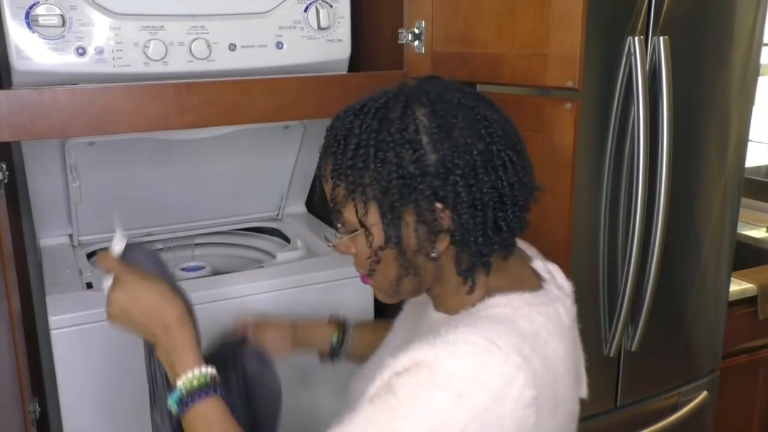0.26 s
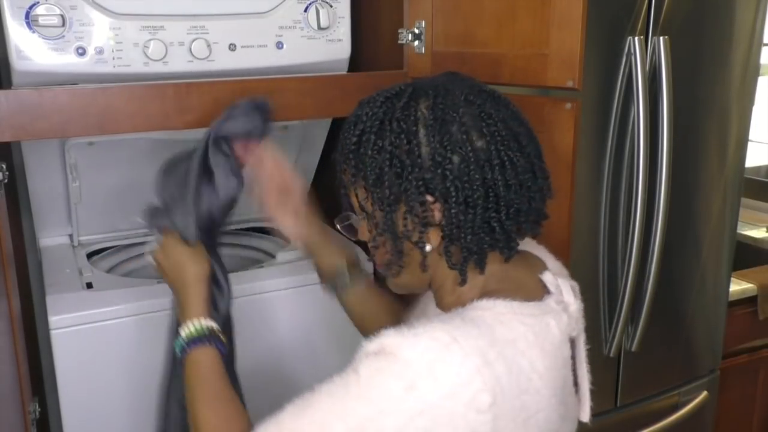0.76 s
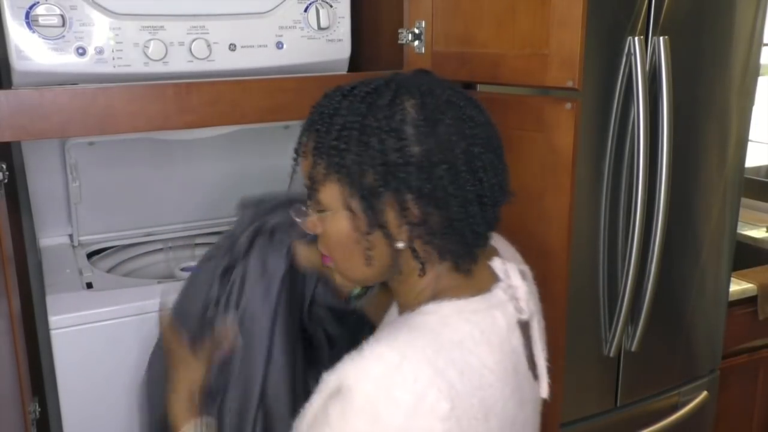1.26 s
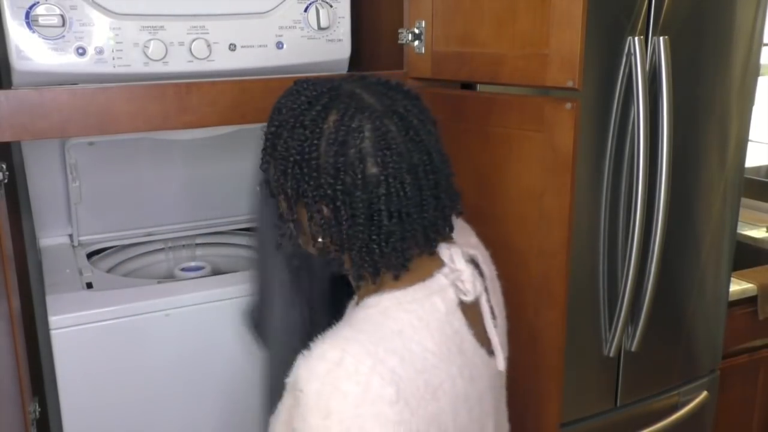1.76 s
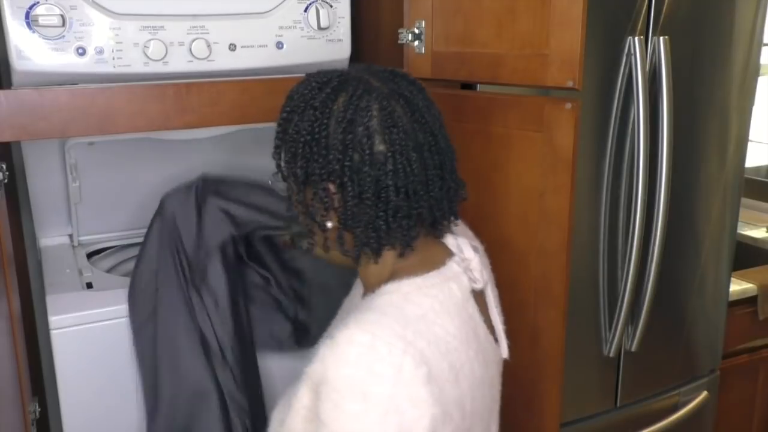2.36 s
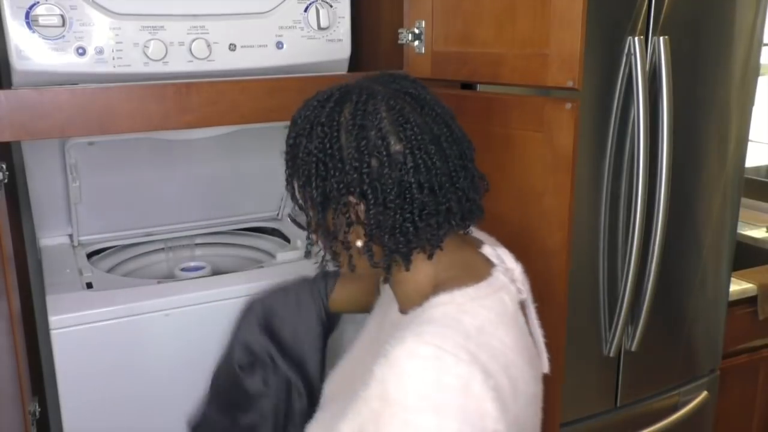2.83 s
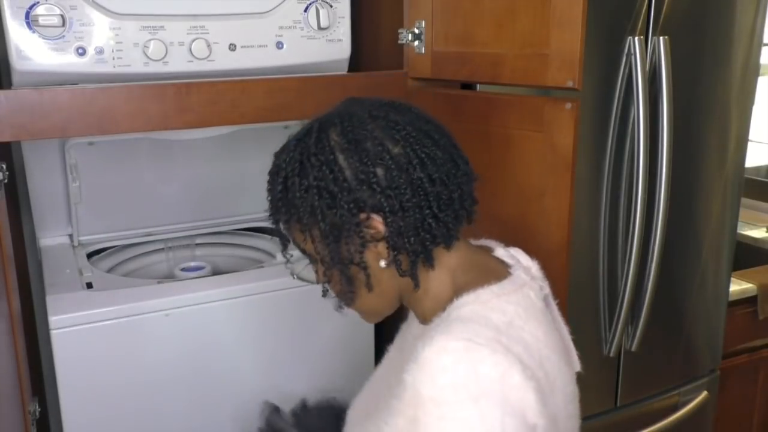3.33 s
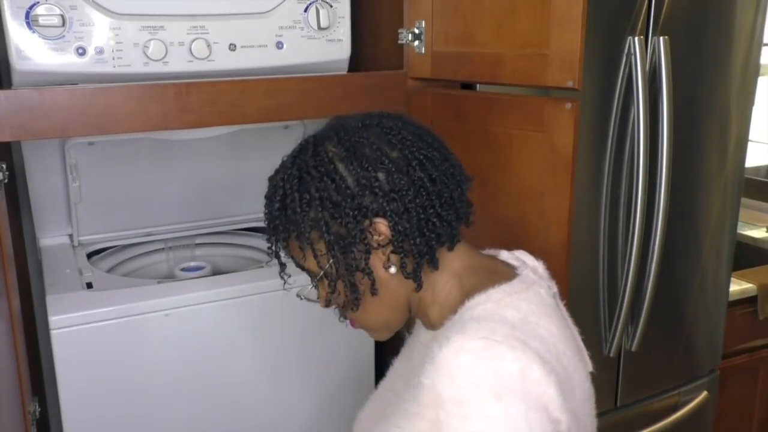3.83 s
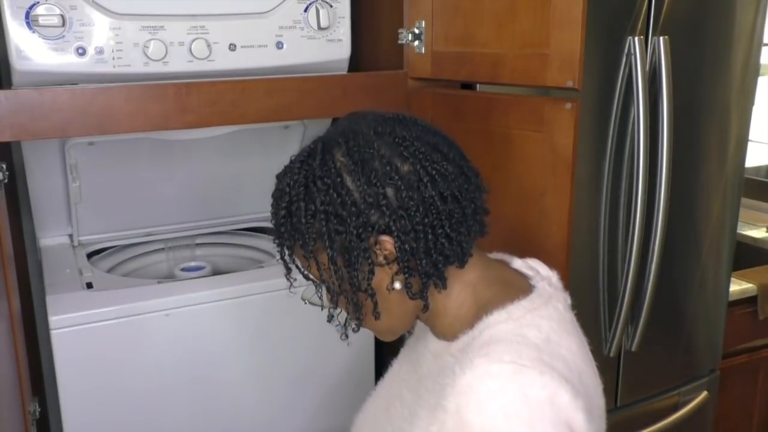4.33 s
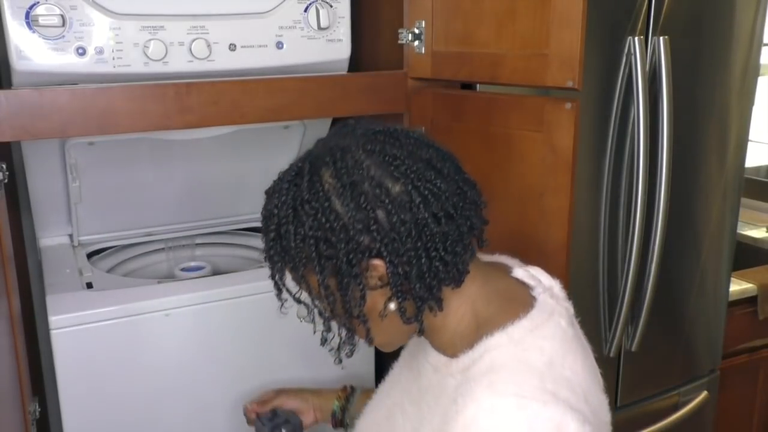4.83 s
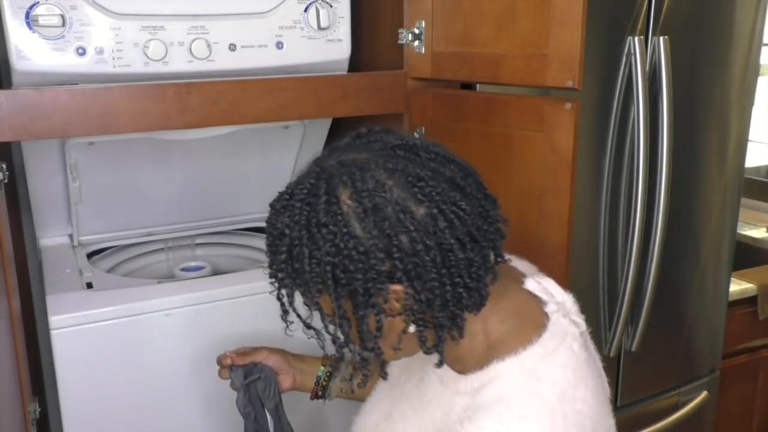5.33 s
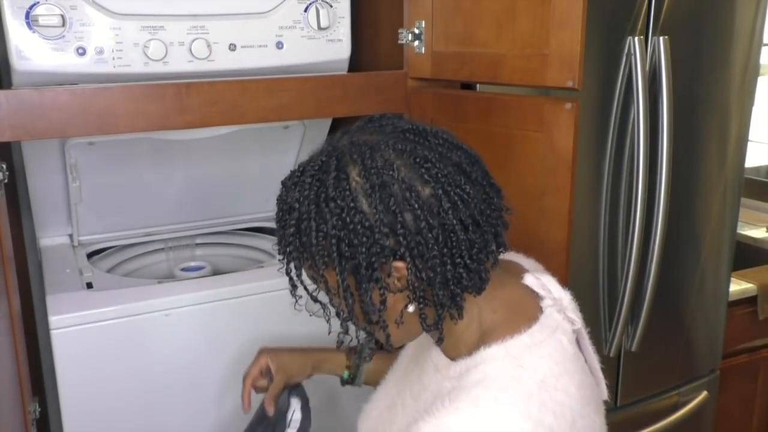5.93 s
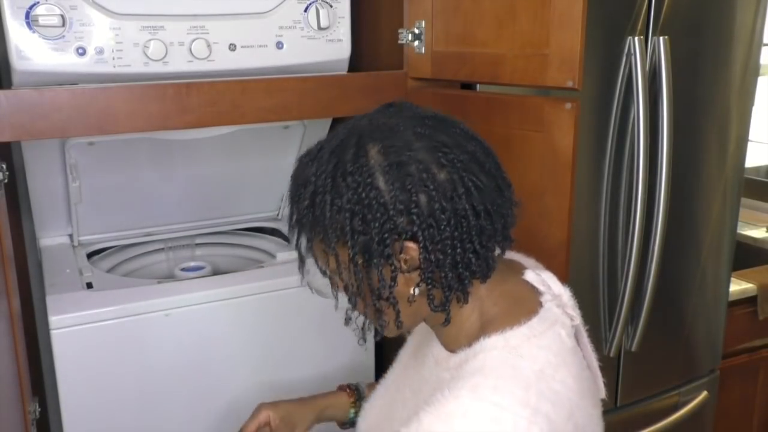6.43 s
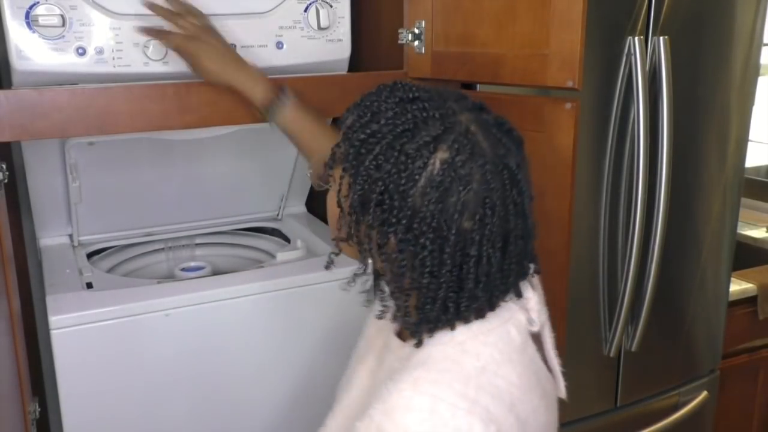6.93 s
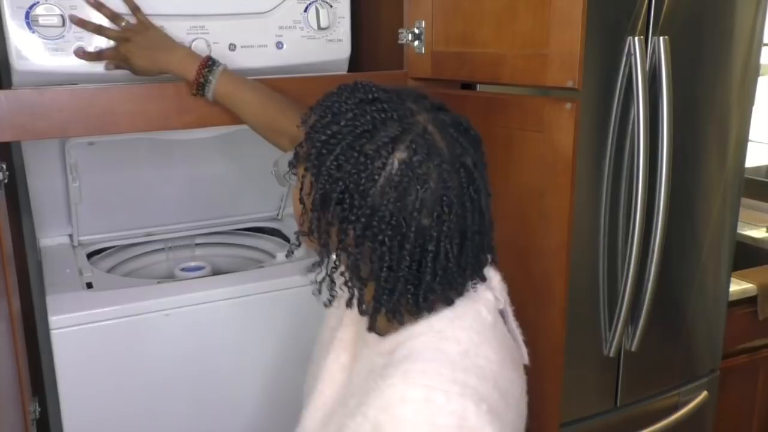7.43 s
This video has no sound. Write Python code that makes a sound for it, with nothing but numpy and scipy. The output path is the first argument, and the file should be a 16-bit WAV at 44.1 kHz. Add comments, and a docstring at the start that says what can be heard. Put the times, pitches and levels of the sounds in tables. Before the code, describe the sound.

Water drums steadily into a hollow washer tub with a soft hiss while a garment is shaken out close by, snapping, rustling, bead bracelets clicking.

```python
"""A top-loading washer fills in a laundry closet: random blows boom in the hollow tub's modes over a faint
pipe drone, and patchy noise hisses through the basket's resonances. Close by, someone shakes out a garment:
swells of coloured noise and crackle rustle, sharp ticks with short noise bursts snap. Bead bracelets click
as wave packets with a brief ring, and hands knock decaying modes out of the control panel."""
import sys
import numpy as np
from scipy import signal
from scipy.fft import rfft, irfft, next_fast_len
from scipy.io import wavfile
from scipy.ndimage import uniform_filter1d, map_coordinates

SR = 44100
rng = np.random.default_rng(int(sys.argv[2]) if len(sys.argv) > 2 else 0)


def store_wav(level_fs):
    """Save 16-bit WAV to argv[1]."""
    pcm = np.round(np.clip(np.atleast_2d(level_fs), -1, 1) * 32767)
    wavfile.write(sys.argv[1], SR, pcm.T.astype(np.int16))


N = 338639
TIME_S = np.arange(N) / SR


def amp(db):
    """Decibels to gain."""
    return 10 ** (np.asarray(db) / 20)


def unit(x):
    """Scale to rms 1."""
    return x / np.sqrt(np.mean(x ** 2) + 1e-20)


def along(points, hz):
    """(f/Hz, value) points read on a log frequency axis."""
    f, v = np.transpose(points)
    return np.interp(np.log(hz + 1), np.log(f + 1), v)


def wobble(rate):
    """A smooth random curve, rate knots a second."""
    knots = rng.standard_normal(int(N * rate / SR) + 4)
    return map_coordinates(knots, [np.arange(N) * rate / SR])


def swell(start_s, length_s, attack_s, release_s):
    """A gain that rises towards 1, stops there, and falls back to 0 once its length is over."""
    t = TIME_S - start_s
    return np.clip(t / attack_s, 0, 1) * np.clip(1 - (t - length_s) / release_s, 0, 1)


def filtered(x, response):
    """x through a response given as a function of frequency."""
    n = x.shape[-1]
    m = next_fast_len(n + 8192)
    return irfft(rfft(x, m) * response(np.fft.rfftfreq(m, 1 / SR)), m)[..., :n]


def resonances(modes, f):
    """Summed power gain of (f/Hz, width/Hz, level/dB) resonances, as amplitude."""
    return np.sqrt(sum(amp(2 * db) / (1 + ((f - hz) / (w / 2)) ** 2) ** 2 for hz, w, db in modes))


def add(track, s, sound):
    """Mix a sound into a track from time s."""
    start = int(np.clip(round(s * SR), 0, N - 1))
    track[start:start + len(sound)] += sound[:N - start]


def impacts(rate, spread_db):
    """Random tiny blows of uneven size, rate a second, rms 1."""
    hit = rng.random(N) < rate / SR
    sign = rng.choice([-1, 1], N)
    size = amp(spread_db * np.clip(rng.standard_normal(N), -2, 2))
    return unit(hit * sign * size)


def patchy(x, depth_db, band_size, time_size):
    """Noise under random gain patches, smoothed over some bands and frames."""
    z = signal.stft(x, nperseg=256)[2]
    across_bands = uniform_filter1d(rng.standard_normal(z.shape), band_size, 0)
    field = uniform_filter1d(across_bands, time_size, 1)
    return signal.istft(z * amp(depth_db * unit(field)), nperseg=256)[1][:N]


def tick(t, hz, cycles):
    """A wave packet whose envelope peaks at 1 after twice the given cycles."""
    u = t * hz / cycles
    return (u / 2) ** 2 * np.exp(2 - u) * np.sin(2 * np.pi * hz * t)


def grains(rate, pitch_hz, octaves, cycles, spread_db):
    """Tiny ticks at random times, each a few cycles of its own pitch; rms 1."""
    when, high, low, size = rng.random((int(rate * N / SR), 4)).T
    hz = pitch_hz * 2 ** (octaves * (high - low))
    gain = amp(spread_db * np.minimum(-np.log(1 - size), 3))
    k = np.arange(SR // 200)
    ticks = gain[:, None] * tick(k / SR, hz[:, None], cycles)
    places = (when * N).astype(int)[:, None] + k
    return unit(np.bincount(places.ravel(), ticks.ravel(), N)[:N])


def band_noise(t, pitch_hz, octaves):
    """Noise of rms 1 in a bell-shaped band."""
    bell = lambda hz: np.exp(-.5 * (np.log2((hz + 1) / pitch_hz) / octaves) ** 2)
    return unit(filtered(rng.standard_normal(len(t)), bell))


def spread(near, response):
    """A coloured source in stereo, rms 1: direct sound plus diffuse sound from the closet walls."""
    # f/Hz, left-right likeness/1
    likeness = [(40, .55), (100, .85), (200, .995), (600, .96), (1150, .9), (1600, 1)]
    turn = lambda hz: np.arccos(np.clip(along(likeness, hz), -1, 1)) / 2
    shares = lambda hz: response(hz) * [np.cos(turn(hz)), np.sin(turn(hz))]
    mid, side = filtered(np.array([unit(near), rng.standard_normal(N)]), shares)
    return unit(np.array([mid + side, mid - side]))


def closet(x, wet_db, t60_s):
    """A sound plus the closet walls' short answer: exponentially dying noise."""
    t = np.arange(SR // 6) / SR
    tail = rng.standard_normal(len(t)) * amp(-60 * t / t60_s)
    return x + amp(wet_db) * signal.fftconvolve(x, tail / np.linalg.norm(tail))[:len(x)]


def panel():
    """Every knock of the hands rings the plastic panel's modes at new strengths over a dull rattle."""
    # knocks: t/s, relative level/dB
    knocks = [(.233, -9.5), (1.918, -15), (7.1446, -19), (7.3106, -8.5), (7.3207, -5.5), (7.3654, -13.5),
              (7.6646, -14)]
    # plastic panel modes: f/Hz, mean relative level/dB, t60/s
    modes = [(1293, -17.5, 0.026), (1731, -9, 0.11), (1950, -3, 0.094)]
    out, t = np.zeros(N), np.arange(SR // 4) / SR
    for s, db in knocks:
        ring = 0
        for hz, level_db, t60_s in modes:
            decay = amp(level_db + rng.normal(0, 2.4) - 60 * t / t60_s)
            ring = ring + decay * np.sin(2 * np.pi * (hz * t + rng.random()))
        ring = ring / np.abs(ring).max()
        rattle = band_noise(t, pitch_hz=1860, octaves=0.43) * amp(-12.0 - 60 * t / 0.18)
        onset = 1 - np.exp(-t / 0.00054)
        add(out, s, amp(db - 6.5) * (0.69 * ring + rattle) * onset)
    return out


def jiggles():
    """Faint bead contacts at random: rows of (t/s, relative level/dB, f/Hz)."""
    per_s, mid_db, mid_hz = 2, -15, 7500
    draws = rng.random((int(per_s * N / SR), 3))
    return [(when * N / SR, mid_db + 4 * (2 * size - 1), mid_hz * 2 ** (.45 * (2 * pitch - 1)))
            for when, size, pitch in draws]


def beads():
    """Each contact is a few cycles of one pitch; the string and the closet ring on briefly."""
    # bead contacts and, near 2.95 s, bright cloth ticks: t/s, relative level/dB, f/Hz
    contacts = [(0.442, -6, 8100), (1.7712, -5.5, 6100), (1.9887, -5.5, 8580), (2.0282, -5, 6600),
                (2.1153, -9.5, 9200), (2.463, -11.5, 7000), (2.5745, -11, 6750), (2.6434, -10.5, 8900),
                (2.6908, -8, 6120), (2.85, -7, 8600), (2.9482, -10.5, 9300), (2.9654, -11, 7500),
                (3.1556, -14, 6060), (3.2286, -10, 5300), (3.3209, -12.5, 5800), (3.4207, -12, 7350),
                (3.728, -5, 5720), (4.0325, -10.5, 5940), (4.3251, -11, 5700), (4.9775, -5, 5570),
                (5.053, -6.5, 5580), (5.1367, -12, 5700), (5.5155, -9.5, 5970), (5.6342, -6.5, 6750),
                (6.7033, -6, 5800), (7.0205, -7.5, 6400), (7.1797, -4.5, 5600)]
    out, t = np.zeros(N), np.arange(SR // 6) / SR
    for s, db, hz in [*contacts, *jiggles()]:
        contact = tick(t, hz, cycles=1.9)
        onset = 1 - np.exp(-t / 0.00042)
        ring = band_noise(t, hz, octaves=.13) * amp(-10.5 - 60 * t / 0.061) * onset
        add(out, s, amp(db + 2) * (contact + ring))
    return out


def snaps():
    """A sharp tick and its quick rebound, a short crack and the closet's dying answer."""
    # cloth snaps and hand taps: t/s, relative level/dB, f/Hz, relative bandwidth/octaves
    events = [(.036, 0, 4500, 0.54), (.159, -6, 4460, .38), (0.2306, -5, 2560, 0.5), (.414, -7, 3270, 0.23),
              (.614, -7.5, 3980, 0.17), (.828, -5, 4730, 0.53), (.9017, -3, 5470, 0.59),
              (1.223, -9.5, 4300, 0.11), (1.284, -4.5, 5250, 0.28), (1.5196, -7, 4900, 0.27),
              (1.63, -3, 4300, 0.51), (2.2249, -1, 4440, 0.52), (2.707, -3.5, 3000, 0.29),
              (4.2191, -14, 3280, .27), (4.324, -5, 3750, 0.18), (4.347, -12, 3050, 0.17),
              (5.061, -4.5, 4260, .39), (5.107, -12, 4760, 0.33), (5.579, -14, 4460, 0.17),
              (5.661, -9.5, 4600, 0.27), (6.336, -14.5, 3550, 0.14), (7.308, -7.5, 4280, 0.17),
              (7.665, -13.5, 3660, 0.22)]
    out, t = np.zeros(N), np.arange(SR // 4) / SR
    onset = 1 - np.exp(-t / 0.00052)
    for s, db, hz, octaves in events:
        crack = band_noise(t, hz, 1.13 * octaves) * amp(1 - 60 * t / 0.034)
        answer = band_noise(t, hz, 0.94 * octaves) * amp(-5 - 60 * t / .15)
        strike = 0.83 * tick(t, hz, cycles=0.67)
        add(out, s, amp(db - 7.5) * (strike + (crack + answer) * onset))
        rebound_s = s + rng.uniform(.003, .007)
        rebound = tick(t, hz * rng.uniform(0.99, 1.57), cycles=1.3)
        add(out, rebound_s, amp(db - 6.5) * rebound)
    return out


def fibres():
    """Cloth rubbing: patchy noise sprinkled with tiny blows."""
    rough = rng.standard_normal(N) + .45 * impacts(rate=500, spread_db=4.5)
    return patchy(rough, depth_db=3.0, band_size=7, time_size=5)


def cloth():
    """Fabric slides over itself in clumps; creases crackle, and coarse folds add a lower scrape."""
    # shakes and tugs: start t/s, length/s, rustle level before clumping/dB, fold scrape re rustle/dB
    strokes = [(0.004, .09, -18, -3.5), (0.116, 0.17, -19, -8.5), (0.295, .25, -18, -15.5),
               (0.568, 0.31, -17, -17), (0.89, 0.12, -20, -31), (1.045, .28, -18.5, -24),
               (1.344, 0.41, -18, -24), (1.829, 0.046, -15.5, -24), (1.923, .12, -18, -34),
               (2.074, 0.089, -22.5, -15), (2.435, .07, -22, -14.5), (2.54, 0.15, -21.5, -16.5),
               (2.754, 0.089, -26, -13)]
    # swish spectrum: f/Hz, relative level/dB
    swish_points = [(1500, -52), (3500, -12), (5000, -5), (6500, 0), (9000, -0.5), (12000, -2.5),
                    (15500, -12)]
    # coarse-fold spectrum: f/Hz, relative level/dB
    fold_points = [(1500, -32), (2300, -14.5), (3000, -7.5), (4000, -5.5), (5500, -4), (8000, -53)]
    level, scraping = np.zeros(N), np.zeros(N)
    for s, length_s, db, scrape_db in strokes:
        gain = amp(db) * swell(s, length_s, attack_s=0.01, release_s=0.068)
        level = np.maximum(level, gain)
        scraping = np.maximum(scraping, gain * amp(scrape_db))
    clumps = amp(1.32 * wobble(42.13) + 1.5 * wobble(150) - 0.37)
    rub = lambda points: unit(filtered(fibres(), lambda hz: amp(along(points, hz))))
    folds = rub(fold_points) * amp(3 * wobble(80))
    creases = grains(rate=300, pitch_hz=7400, octaves=.6, cycles=1.9, spread_db=5)
    threads = grains(rate=220, pitch_hz=12800, octaves=0.55, cycles=2.7, spread_db=8.0)
    crackle = unit(closet(creases + .36 * threads, wet_db=-1, t60_s=.05))
    # as the shaking slows, separate crackles take over from the swish
    share = np.clip(0.091 + 0.2 * TIME_S, 0, 1)  # crackle's share of power
    rustle = np.sqrt(1 - share) * rub(swish_points) + np.sqrt(share) * crackle
    return clumps * (level * rustle + scraping * folds)


def spray():
    """Fine droplets hiss on the steel basket and pick out its resonances."""
    # spray hiss: t/s, level before the fixed trim and wobble/dB
    hiss_rows = [(2.9, -30), (3.1, -30), (3.88, -30), (4.11, -29.5), (5.6, -26.5), (6.07, -29.5),
                 (6.85, -28), (7.68, -30.5)]
    # steel basket resonances: f/Hz, width/Hz, lift/dB
    basket = [(1235, 21, 8), (2020, 120, 5), (2810, 280, 5), (3560, 23, 9), (3600, 40, -2), (4070, 38, 7.5),
              (4480, 81, 5), (4840, 57, 5), (4780, 160, 4), (5630, 62, 9), (6720, 45, 3), (9170, 120, 5.5)]
    # hiss spectrum: f/Hz, relative level/dB
    hiss_points = [(440, -39), (750, -9.5), (831, -24.5), (1010, -17), (1480, -10), (2170, -11.5),
                   (2370, -9), (3110, -11), (3580, -5.5), (5250, -6), (6360, 1.5), (11000, -4),
                   (12500, -8.5), (15000, -1.5), (16000, -5.5)]
    hiss_db = np.interp(TIME_S, *np.transpose(hiss_rows))
    lift_db = lambda f: sum(db / (1 + ((f - hz) / (w / 2)) ** 2) for hz, w, db in basket)
    colour = lambda hz: amp(along(hiss_points, hz) + lift_db(hz))
    droplets = rng.standard_normal(N) + 0.65 * impacts(rate=1100, spread_db=7.0)
    drops = patchy(droplets, depth_db=2.4, band_size=5, time_size=9)
    level_db = hiss_db + 2.86 + 0.4 * wobble(40) + 0.54 * wobble(8.6)
    return amp(level_db) * spread(drops, colour)


def tub():
    """The falling stream pelts the tub, whose low modes boom unevenly; the inlet pipe drones steadily."""
    # hollow tub modes: f/Hz, width/Hz, relative level/dB
    tub_modes = [(197, 25, -10), (247.3, 19, -5.5), (285.7, 22, -1.5), (329.2, 45.3, 1.5),
                 (382.2, 22, -0.5), (418.5, 33.5, -3.5), (474, 30, -12.5), (557, 88, -19), (645.3, 33, -13),
                 (711, 16.6, -17), (950, 305, -28)]
    # inlet pipe resonances: f/Hz, width/Hz, relative level/dB
    pipe_modes = [(199.2, 31, -1.5), (637.4, 23, -3.5), (704, 16, -3.5), (1041, 36, -9.5)]
    # rumble spectrum: f/Hz, relative level/dB
    rumble_points = [(25, -32), (60, -37), (110, 0.5), (180, 6), (450, 10), (800, -16), (1500, -16)]
    # drumming surges: start t/s, length/s, full lift/dB
    surges = [(0.056, 0.46, 5), (0.485, .39, 7.5), (1.136, 0.056, 6), (1.265, 0.04, 7), (1.368, 0.28, 6),
              (1.638, 0.12, 7), (1.837, 0.21, 5), (2.74, 0.28, 3), (4.086, .11, 6.5), (4.648, 0.13, 4.5),
              (5.084, 0.12, 3), (5.38, 0.21, 4)]
    start_db, sink_db_per_s = -29, 0.3941  # the drumming softens as water pools
    surge_db = sum(db * swell(s, length_s, attack_s=0.057, release_s=0.013) for s, length_s, db in surges)
    drum_db = start_db - sink_db_per_s * TIME_S + surge_db + 0.62 * wobble(25)
    boom = spread(impacts(rate=900, spread_db=3), lambda f: resonances(tub_modes, f))
    rumble = spread(rng.standard_normal(N), lambda hz: amp(along(rumble_points, hz)))
    drone = spread(rng.standard_normal(N), lambda f: resonances(pipe_modes, f))
    return amp(drum_db) * (boom + amp(-17.5) * rumble) + amp(-50) * drone


def scene():
    """The water's low boom lies to the right; the handling is close and central."""
    # water's level balance: f/Hz, left minus right level/dB
    balance = [(30, -1), (100, -8.5), (200, -9), (380, -7), (700, -3), (1100, 0)]
    # water's phase lead: f/Hz, left ahead of right/rad
    phase_lead = [(60, .3), (250, .55), (600, .5), (900, .7), (1200, .55), (1600, 0)]

    def lean(hz):
        gain = amp(np.outer([1, -1], along(balance, hz)) / 2)
        return gain * np.exp(.5j * np.outer([1, -1], along(phase_lead, hz)))

    water = filtered(tub() + spray(), lambda hz: lean(hz) / lean(hz).mean(axis=0))
    return water + cloth() + beads() + snaps() + panel()


def record(dry):
    """The microphone sheds deep bass, the loudest clicks are rounded off and a band limit cuts the top."""
    thin = filtered(dry, lambda hz: hz ** 2 / (hz ** 2 + 42 ** 2))
    rounded = thin / (1 + np.abs(thin) ** 12) ** (1 / 12)
    top_hz = 15850
    return filtered(rounded, lambda hz: hz < top_hz)


dry = scene()
out = record(dry)
store_wav(out)
```